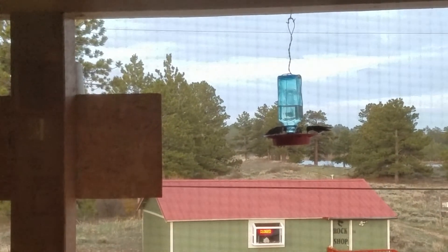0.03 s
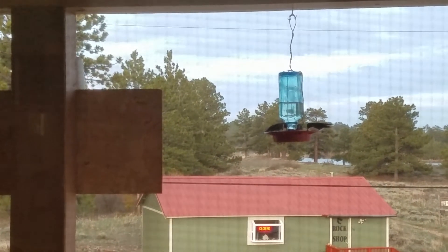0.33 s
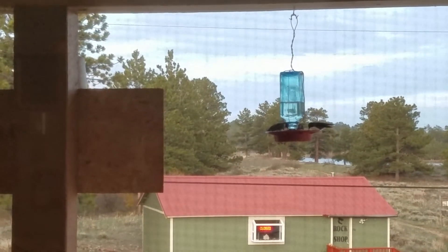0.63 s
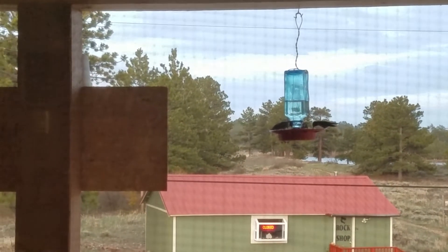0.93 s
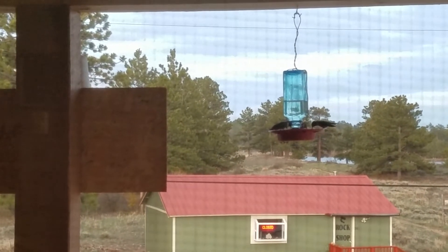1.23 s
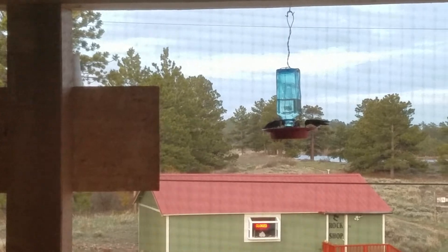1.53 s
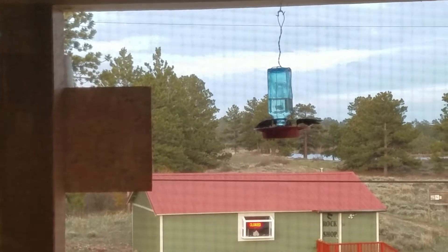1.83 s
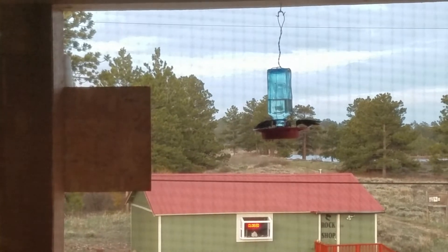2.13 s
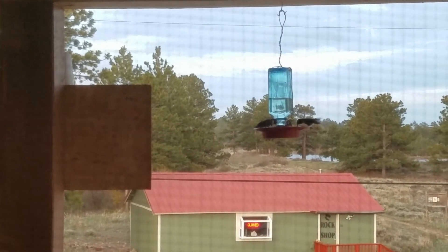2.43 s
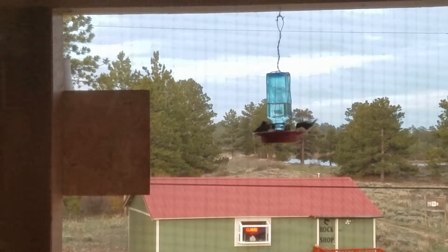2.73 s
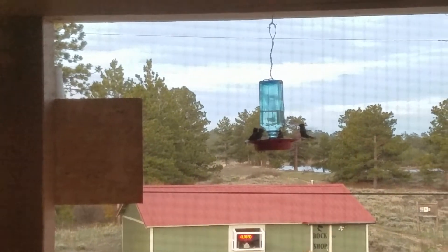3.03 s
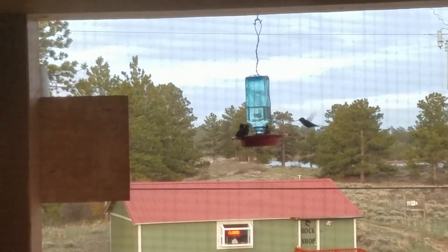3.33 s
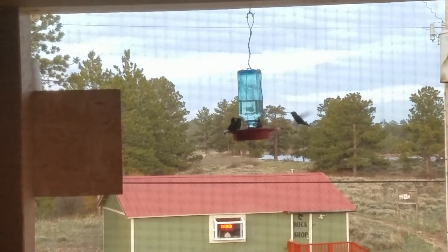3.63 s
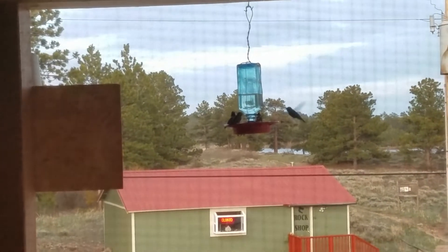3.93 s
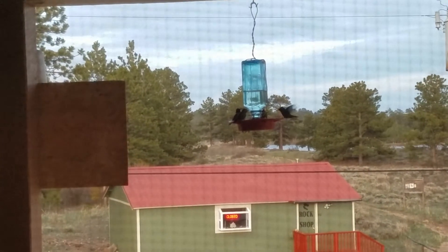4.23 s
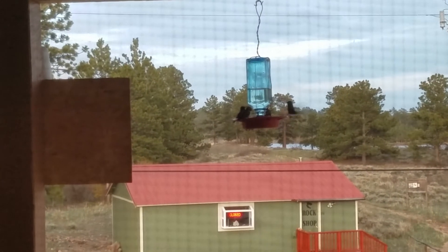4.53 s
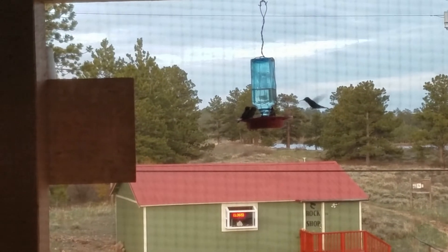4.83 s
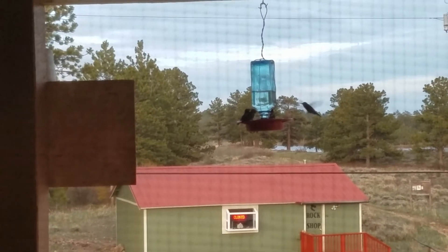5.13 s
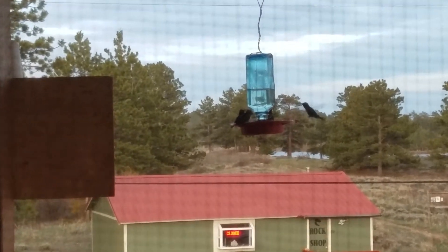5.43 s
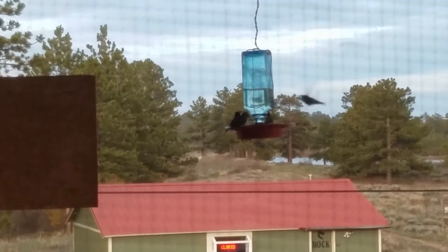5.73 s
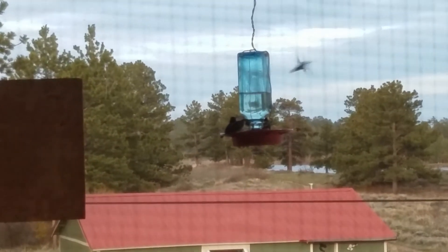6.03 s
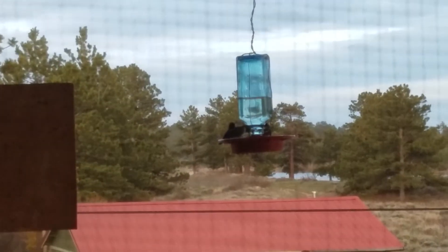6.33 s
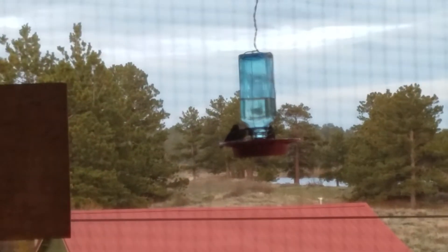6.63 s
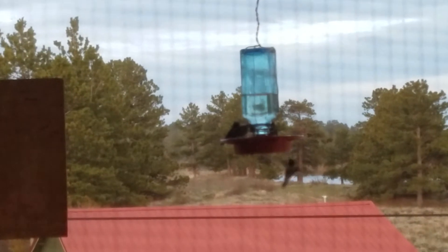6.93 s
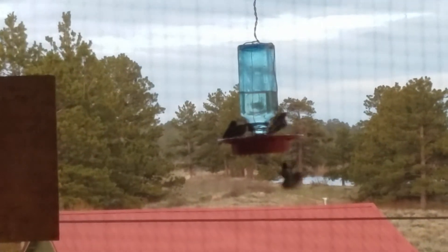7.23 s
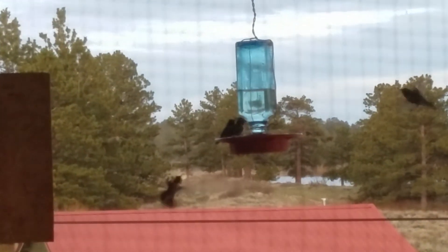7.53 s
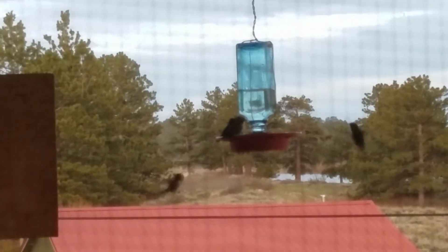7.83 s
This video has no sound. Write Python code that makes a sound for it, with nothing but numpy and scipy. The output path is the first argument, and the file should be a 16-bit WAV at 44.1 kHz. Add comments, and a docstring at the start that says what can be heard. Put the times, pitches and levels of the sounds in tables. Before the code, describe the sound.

Fingers tick, bump and slide close to the microphone, then a short scrape ends in one heavy thud that booms through a wooden house. Outside the window, hummingbirds begin a faint, high wing trill that comes in spurts and grows louder, with a low whirr as they pass and a few hoarse squeaks near the end. A quiet appliance hum with a thin electric buzz runs underneath.

```python
"""Hummingbirds through a window screen

Hummingbirds trill round a feeder: each wingbeat whistles near 6 kHz, louder and higher in every spurt
of flight, and a chase ends in hoarse squeaks. Up close, hands shift on a camera with ticks and soft
bumps, and one heavy thud sets the wooden house booming. Under it all lies the bed of the room:
an appliance motor's hum, with a thin mains buzz."""
import sys
import numpy as np
from scipy import signal
from scipy.fft import rfft, irfft, next_fast_len
from scipy.io import wavfile
from scipy.ndimage import map_coordinates

SR = 44100
rng = np.random.default_rng(int(sys.argv[2]) if len(sys.argv) > 2 else 0)


def store_pcm(level_fs):
    """Save levels as 16-bit WAV."""
    pcm = np.round(np.clip(level_fs, -1, 1) * 32767).astype(np.int16)
    wavfile.write(sys.argv[1], SR, np.atleast_2d(pcm).T)


N = 348390
TIME = np.arange(N) / SR

# room air, mid and side EQ: (frequency [Hz], relative level [dB])
AIR_MID = [(20, -14.5), (50, -10), (90, -0.5), (130, -6), (200, 1.5), (300, -3.5), (450, -11.5), (800, -17),
           (1300, -20.5), (2100, -18.5), (3200, -25), (5500, -29), (9000, -35.5), (14500, -25)]
AIR_SIDE = [(20, -8.5), (70, -1.5), (200, -2.5), (450, -7), (900, -9), (1400, -15), (2100, -11),
            (3200, -17), (5500, -19), (9000, -27), (14500, -16.5)]
# motor tones: (frequency [Hz], level [dB])
MOTOR_TONES = [(118.4, -65), (193.8, -70), (226.1, -74.5), (355, -81.5), (452.2, -79)]
# fader on the motor's lowest tone: (time [s], level [dB])
SHAFT_FADER = [(0, -65.5), (4.2, -66.5), (4.8, -74), (5.5, -74), (6, -67), (7.1, -68.5), (7.5, -78)]
SHAFT_HZ, MAINS_HZ = 59.3, 60.015
APPLIANCE_LAG_S = .00043  # it stands to the right, so the left hears it later
# buzz partials: (multiple of the mains)
BUZZ_ORDERS = [10, 12, 14, 16, 22, 26, 32, 33, 34, 36, 38, 39, 40]
# their balance: (left level [dB], right level [dB])
BUZZ_BALANCE = [(-102, -78.5), (-80, -83), (-70.5, -76), (-89, -74), (-67, -71), (-78, -78.5), (-77, -80.5),
                (-93, -76), (-66.5, -69.5), (-80, -82.5), (-95, -80), (-91, -82), (-76.5, -90)]
# stereo offset of the buzz: (frequency [Hz], right phase lag [rad])
BUZZ_PHASE = [(700, -1), (850, -2.5), (1320, -3), (1560, -2), (1900, 1), (2100, 0.47), (2400, -.8)]
# whine partials: (multiple of the mains)
WHINE_ORDERS = [83, 85, 87, 91, 93, 95, 109, 111, 169, 230, 234, 240, 242]
# their balance: (relative level [dB])
WHINE_BALANCE = [-10, -9.5, -10, -12.5, -3, -8, -9, -9.5, -10.5, -8, -12, -10, -8.5]
# faders on the buzz and the whine: (time [s], gain [dB])
BUZZ_FADER = [(.8, -3), (1.1, -7), (1.7, -0.5), (1.9, -1.8), (7.9, -1.5)]
WHINE_FADER = [(0, -75), (1.7, -83), (1.9, -74), (4.6, -75.5), (7.9, -75.5)]
# porch reverb: (frequency [Hz], t60 [s])
PORCH_DECAY = [(200, 0.12), (6000, 0.4), (15000, 0.031)]
# soft swishes: (middle [s], half length [s], level [dB], centre [Hz], width [octaves])
SWISHES = [(2.983, 0.096, -67, 12000, 0.53), (3.23, 0.085, -69.5, 11500, .6), (5.882, .016, -69, 6800, .04),
           (7.377, 0.075, -66.5, 5440, 0.53), (7.463, 0.047, -66.5, 5800, 0.63)]

# fingers on the case: (time [s], tick gain [dB], snap gain [dB], snap centre [Hz], knock gain [dB])
TOUCHES = [(0.019, -47.5, -50, 1810, -37.5), (0.1562, -44, -47, 1900, -39.5),
           (0.196, -47.5, -60, 5130, -54), (0.2253, -51.5, -52, 1400, -56), (.3424, -50, -61, 2400, -53.5),
           (0.3687, -54, -49.5, 2040, -58), (0.4532, -55, -54, 1100, -49.5),
           (0.4898, -48, -55, 5000, -52.5), (.511, -54, -53, 1400, -54.5), (0.5899, -58, -57.5, 4770, -65),
           (0.7307, -43.5, -54, 2500, -53.5), (1.7021, -55, -52, 1500, -52), (1.7253, -53, -54, 1800, -57),
           (1.742, -55, -51, 1800, -57), (1.7541, -33.5, -32, 2150, -41), (1.8603, -49, -52, 3000, -49.5),
           (2.1667, -51, -50, 15200, -65), (2.388, -43, -53, 2400, -50), (2.4071, -44, -54, 3000, -50),
           (5.002, -76, -72, 1500, -59.5)]
# soft bumps of the hand: (time [s], gain [dB])
BUMPS = [(0.055, -40.5), (0.167, -34.5), (.192, -41), (.272, -42.5), (0.384, -47.5), (0.496, -47.5),
         (0.62, -43.5), (0.756, -47), (2.435, -43.5)]
# the grip slides:
# (firmest from [s], attack [s/10 dB], hold [s], release [s/10 dB], rumble gain [dB], rustle gain [dB])
SLIDES = [(0.028, 0.054, 0.029, 0.098, -49.5, -59), (0.196, 0.062, .04, 0.025, -48.5, -67),
          (0.434, .14, 0.072, 0.088, -50.5, -66.5), (0.75, 0.16, 0.093, 0.066, -56.5, -72),
          (1.657, 0.05, 0.25, 0.15, -51, -70), (2.234, 0.089, .02, 0.086, -59, -66),
          (2.404, 0.025, 0.016, 0.19, -58.5, -72)]
# modes of the case, the camera in the hand and the house: (frequency [Hz], relative level [dB], t60 [s])
CASE_MODES = [(186, -7.5, 0.13), (291.2, -2, 0.13), (504.4, -1.5, 0.062), (593, 0, 0.052), (695, -7, 0.071),
              (840, -7, 0.045), (1280, -11, 0.043), (1560, -23, 0.027)]
HAND_MODES = [(70.7, -1.5, 0.29), (87, -16, 0.2), (110.2, 3, 0.18)]
HOUSE_MODES = [(27, -40, 1.27), (60.3, -31, 1.06), (101, -35.5, 0.94), (123, -46, 0.41),
               (175.4, -36.5, 0.56), (194, -32.5, 0.13), (238, -39.5, 0.51), (278, -45, 0.53),
               (355, -33.5, 0.22), (487, -48.5, 0.29), (579, -32, 0.12), (691, -39.5, 0.16),
               (1065, -41, 0.12)]
# EQ of the contact noises: (frequency [Hz], relative level [dB])
TICK_EQ = [(2000, -19), (3900, -8), (4900, 6.5), (6000, 0.5), (7100, -9), (8500, -1.5), (11000, -6.5),
           (16000, -4)]
RUMBLE_EQ = [(20, -21), (45, -27), (70, -1), (115, 1), (160, -9), (290, -11), (420, -25.5), (800, -26.5),
             (2000, -64)]
RUSTLE_EQ = [(150, -4), (500, 1), (1200, -4.5), (2200, -10.5), (3500, -17.5), (5200, -14), (7500, -23.5),
             (16000, -22.5)]
SCRAPE_EQ = [(40, -25), (120, 14.5), (350, 2.5), (800, 1), (1400, -14.5), (2100, -11), (3200, -21),
             (5300, -18.5), (8000, -28.5), (16000, -29)]
# the scrape grips, then bears down at the thud:
# (full from [s], attack [s/10 dB], hold [s], release [s/10 dB], gain [dB])
SCRAPE_DRAG = (1.779, 0.022, 0.07, 0.019, -42)
SCRAPE_PRESS = (1.809, .018, .004, .036, -36)

# chase squeaks: (start [s], length [s], from [Hz], to [Hz], roughness [share of pitch], gain [dB])
SQUEAKS = [(7.3, .11, 4100, 3750, .11, -69.5), (7.432, .05, 4150, 3700, .09, -73),
           (7.546, .08, 3000, 2500, .06, -67)]
# their harmonics, fundamental first: (relative level [dB])
SQUEAK_HARMONICS = [-2, -5, -7, -10]
# close fly-bys: (nearest [s], approach [s/10 dB], retreat [s/10 dB], level [dB])
FLY_BYS = [(5.78, 0.28, 0.2, -64.5), (7.35, 0.2, 0.69, -62)]
# air pushed by the wings: (frequency [Hz], relative level [dB])
WHIRR_EQ = [(60, -40), (110, -3), (220, -2.5), (330, -14.5), (600, -24), (2000, -62)]
# spurts of flight:
# (full effort from [s], attack [s/10 dB], hold [s], release [s/10 dB], level [dB], base pitch [Hz])
SPURTS = [(3.177, 0.12, .03, .045, -66, 6250), (3.32, .02, .01, .04, -71, 6070),
          (3.41, .05, .03, .04, -73, 6120), (3.522, 0.027, 0.016, 0.033, -68.5, 6200),
          (3.733, 0.13, 0.2, 0.13, -74.5, 5990), (4.45, 0.034, 0.12, 0.037, -65, 6250),
          (4.698, 0.018, .01, .09, -75, 6200), (4.89, 0.078, .03, .035, -71, 6170),
          (5.10, 0.12, .03, 0.063, -71.5, 6160), (5.35, 0.089, .03, .04, -65.5, 6090),
          (5.46, 0.023, .01, 0.037, -65.5, 6250), (5.767, 0.32, 0.035, 0.28, -59, 6280),
          (6.37, .04, .02, 0.028, -76, 6030), (6.477, 0.023, 0.12, 0.04, -64, 6170),
          (6.631, .07, .09, .02, -60.5, 6210), (6.797, 0.022, 0.065, 0.066, -67.5, 6200),
          (7.06, .06, 0.027, .04, -71, 6060), (7.215, 0.058, 0.055, .1, -66.5, 6420),
          (7.405, 0.14, .1, .05, -61.5, 6310), (7.568, 0.028, .03, 0.046, -58.5, 6270),
          (7.73, 0.033, 0.018, 0.099, -58.5, 6290), (7.88, 0.033, .03, .1, -61.5, 6180)]


def amp(db):
    """Decibels to gain."""
    return 10 ** (np.asarray(db) / 20)


def unit(x):
    """Scale to rms 1."""
    return x / np.sqrt(np.mean(x ** 2) + 1e-20)


def along(points, hz):
    """Read (Hz, value) points on a log axis."""
    f, v = np.transpose(points)
    return np.interp(np.log(hz + 1), np.log(f + 1), v)


def fader(rows):
    """Gain that rides through (s, dB) points."""
    return amp(np.interp(TIME, *np.transpose(rows)))


def swell(s, attack, hold, release):
    """Envelope in dB, 0 while held; attack and release are the times for 10 dB."""
    return -10 * (np.maximum(s - TIME, 0) / attack + np.maximum(TIME - s - hold, 0) / release)


def wobble(rate):
    """A smooth random curve, rate knots a second."""
    return map_coordinates(rng.standard_normal(int(N * rate / SR) + 4), [TIME * rate])


def filtered(x, response):
    """Shape x by a frequency response."""
    size = next_fast_len(x.shape[-1] + 8192)
    return irfft(rfft(x, size) * response(np.fft.rfftfreq(size, 1 / SR)), size)[..., :x.shape[-1]]


def noise(eq):
    """Coloured noise of rms 1."""
    return unit(filtered(rng.standard_normal(N), lambda hz: amp(along(eq, hz))))


def hiss_band(size, centre_hz, octaves):
    """Stereo noise of rms 1 in one bell-shaped band."""
    white = rng.standard_normal((2, size))
    return unit(filtered(white, lambda hz: np.exp(-.5 * (np.log2((hz + 1) / centre_hz) / octaves) ** 2)))


def spread(mid, side):
    """Mid and side to left and right."""
    return np.array([mid + side, mid - side])


def add(track, s, sound):
    """Mix a sound into a track at time s."""
    start = max(round(s * SR), 0)
    track[..., start:start + sound.shape[-1]] += sound[..., :N - start]


def ring(modes, attack_s, scatter_db, width):
    """Damped modes after one blow; the higher ones tend to sit wider in the stereo image."""
    t = np.arange(2 * SR) / SR
    out = np.zeros((2, len(t)))
    for hz, db, t60 in modes:
        age = t[:int(t60 * 1.5 * SR)]
        offset = np.minimum(width * hz / 1000, 1) * rng.uniform(-1, 1) * np.array([[1], [-1]])
        decay = amp(db + scatter_db * rng.normal() - 60 * age / t60)
        add(out, 0, decay * np.sin(2 * np.pi * hz * age + offset))
    return out * (1 - np.exp(-t / attack_s))


def porch(x):
    """Dense reflections from walls and eaves, different in each channel."""
    hz, t, spectrum = signal.stft(rng.standard_normal((2, SR // 3)), SR, nperseg=256)
    decay = amp(-60 * t / along(PORCH_DECAY, hz)[:, None])
    tail = signal.istft(spectrum * decay, SR, nperseg=256)[1]
    return signal.fftconvolve(np.atleast_2d(x), tail / np.linalg.norm(tail[0]), axes=1)[:, :N]


def room_air():
    """Still air: a soft, dark bed of noise."""
    return spread(amp(-64.5) * noise(AIR_MID), amp(-69) * noise(AIR_SIDE))


def motor():
    """The appliance motor hums in wavering tones over a shaft note that swells and fades."""
    hum = sum(amp(db + wobble(3.2)) * np.sin(2 * np.pi * hz * TIME + wobble(2.02) / 2)
              for hz, db in MOTOR_TONES)
    return hum + fader(SHAFT_FADER) * np.sin(2 * np.pi * SHAFT_HZ * TIME)


def mains_buzz():
    """Iron driven by the mains buzzes at multiples of its frequency."""
    buzz = np.zeros((2, N))
    for order, (left_db, right_db) in zip(BUZZ_ORDERS, BUZZ_BALANCE):
        hz = order * MAINS_HZ
        phase = 2 * np.pi * (hz * TIME + rng.random())
        waver_db = (.5 + min(hz / 6000, 1)) * wobble(2.07)  # short waves fade more as the camera sways
        left = amp(left_db) * np.sin(phase)
        right = amp(right_db) * np.sin(phase - along(BUZZ_PHASE, hz))
        buzz += amp(waver_db) * np.array([left, right])
    return fader(BUZZ_FADER) * buzz


def whine():
    """High multiples of the mains swell together and waver singly, louder and earlier on the right."""
    out = np.zeros((2, N))
    for order, db in zip(WHINE_ORDERS, WHINE_BALANCE):
        start = rng.random()
        for channel, pan_db, lag_s in zip(out, (-7, 0), (APPLIANCE_LAG_S, 0)):
            phase = 2 * np.pi * (order * MAINS_HZ * (TIME - lag_s) + start)
            channel += amp(db + pan_db + 2.5 * wobble(7)) * np.sin(phase)
    return fader(WHINE_FADER) * out


def draught():
    """A faint band of hiss from the right reaches the left channel later."""
    right = hiss_band(N, centre_hz=1205, octaves=.22)[0]
    left = filtered(right, lambda hz: np.exp(-2j * np.pi * hz * APPLIANCE_LAG_S))
    return amp(-77.5) * np.array([left, right])


def swishes():
    """Short ragged puffs of hiss."""
    out = np.zeros((2, N))
    for s, half_s, db, centre_hz, octaves in SWISHES:
        window = np.hanning(int(2 * half_s * SR))
        add(out, s - half_s, amp(db) * window * hiss_band(len(window), centre_hz, octaves))
    return out * unit(amp(1.7 * wobble(180)))


def clicks():
    """Each contact gives the case's bright tick and a snap whose pitch depends on the spot touched."""
    ticks, snaps = np.zeros((2, N)), np.zeros((2, N))
    t = np.arange(SR // 20) / SR
    envelope = np.exp(-t / .0035) * (1 - np.exp(-t / .0005))
    for s, tick_db, snap_db, snap_hz, _ in TOUCHES:
        add(ticks, s, amp(tick_db) * envelope * rng.standard_normal((2, len(t))))
        add(snaps, s, amp(snap_db) * envelope * hiss_band(len(t), snap_hz, octaves=.56))
    out = filtered(ticks, lambda hz: amp(along(TICK_EQ, hz))) + snaps
    return out + amp(-15) * porch(out)


def handling(knock_lag_s=.0036):
    """Fingers knock on the case, bump it softly and slide over it."""
    body = np.zeros((2, N))
    for s, *_, db in TOUCHES:  # the case gives way just after the tick
        add(body, s + knock_lag_s, amp(db) * ring(CASE_MODES, attack_s=.0008, scatter_db=1, width=.6))
    for s, db in BUMPS:
        add(body, s, amp(db) * ring(HAND_MODES, attack_s=.0055, scatter_db=2.5, width=2.6))
    rumble = sum(amp(db + swell(*shape)) for *shape, db, _ in SLIDES)
    rustle = sum(amp(db + swell(*shape)) for *shape, _, db in SLIDES)
    body += rumble * spread(noise(RUMBLE_EQ), amp(-6.5) * noise(RUMBLE_EQ))
    grain = unit(amp(2.6 * wobble(160)))
    return body + rustle * grain * spread(noise(RUSTLE_EQ), amp(2.5) * noise(RUSTLE_EQ))


def thud(hit_s=1.802):
    """A gritty scrape peaks in one heavy push, and the wooden house rings low."""
    pressure = np.maximum(*[amp(db + swell(*shape)) for *shape, db in (SCRAPE_DRAG, SCRAPE_PRESS)])
    grit = unit(amp(1.5 * wobble(300)))
    out = pressure * grit * spread(noise(SCRAPE_EQ), amp(.5) * noise(SCRAPE_EQ))
    add(out, hit_s, ring(HOUSE_MODES, attack_s=.002, scatter_db=0, width=1.3))
    # the punch lasts a few milliseconds; the air draws back before and after it
    u = (TIME - hit_s - .0026) / .0014
    out += amp(-21.5) * (1 - u ** 2) * np.exp(-u ** 2 / 2)
    return out * amp([[-.7], [.7]])  # a touch to the right


def squeaks():
    """The birds scold: falling notes whose pitch shakes so fast that they rasp."""
    notes = np.zeros(N)
    for s, length, from_hz, to_hz, rough, db in SQUEAKS:
        progress = np.clip((TIME - s) / length, 0, 1)
        glide_hz = from_hz + (to_hz - from_hz) * progress
        phase = 2 * np.pi * np.cumsum(glide_hz * (1 + rough * wobble(1500))) / SR
        tone = sum(amp(db + part_db) * np.sin(k * phase) for k, part_db in enumerate(SQUEAK_HARMONICS, 1))
        notes += np.sin(np.pi * progress) * tone
    return amp(-3) * notes + amp(-4) * porch(notes)


def wingbeats(beat_hz, drift):
    """Count of wingbeats so far, at a slightly unsteady rate."""
    return np.cumsum(beat_hz * (1 + drift * wobble(5))) / SR


def wing_whirr(beats):
    """On a close fly-by, the air pushed by each stroke is heard as a low flutter."""
    puffs = noise(WHIRR_EQ) * (1 + .82 * np.cos(2 * np.pi * beats))
    nearness = sum(amp(db + swell(s, approach, 0, retreat)) for s, approach, retreat, db in FLY_BYS)
    return nearness * unit(puffs)


def flight(hover_from_s=2.8, hover_db=-84, hover_hz=6130, sag_hz_per_db=15):
    """Loudness and pitch of the trill: spurts swell over faint hovering; pitch sinks as effort ebbs."""
    power = amp(hover_db + swell(hover_from_s, .05, N / SR, 1)) ** 2 + 1e-20
    weighted_hz = power * hover_hz
    for s, attack, hold, release, db, hz in SPURTS:
        effort_db = swell(s, attack, hold, release)
        spurt = amp(db + effort_db) ** 2
        power += spurt
        weighted_hz += spurt * (hz + sag_hz_per_db * np.maximum(effort_db, -20))
    return np.sqrt(power), weighted_hz / power


def wing_whistle(beats, pitch_hz, scatter_hz, echo_s, echo_db, burst_s=.0015, paths=28):
    """Air whistles through the wingtip feathers once a stroke; each burst finds new echoes in flight."""
    strokes = np.flatnonzero(np.diff(np.floor(beats)) > 0)
    hz = pitch_hz[strokes, None, None] + scatter_hz * rng.standard_normal((len(strokes), paths, 1))
    t = np.arange(-SR // 220, SR // 220) / SR
    window = np.exp(-.5 * (t / burst_s) ** 2)
    strength_db = 1.1 * rng.standard_normal((len(strokes), 1, 1))
    out = []
    for direct_db in (-2, 5):  # the straight path is louder on the right
        delay = rng.exponential(echo_s, hz.shape)  # later echoes are rarer and weaker
        level_db = echo_db - 3 * delay / echo_s
        delay[:, 0], level_db[:, 0] = 0, direct_db
        phase = 2 * np.pi * (hz * t + rng.random(hz.shape))
        bursts = amp(strength_db + level_db) * window * np.sin(phase)
        samples = strokes[:, None, None] + (delay * SR).astype(int) + np.arange(len(t))
        out.append(np.bincount(samples.ravel(), bursts.ravel(), N)[:N])
    return unit(np.array(out))


def hummingbirds():
    """Two birds trill with their wings: the near one drier and whirring, the far one washed in echoes."""
    near, far = wingbeats(beat_hz=48.33, drift=.02), wingbeats(beat_hz=42.1, drift=.06)
    loudness, pitch_hz = flight()
    trill = wing_whistle(near, pitch_hz + 20, scatter_hz=100, echo_s=.017, echo_db=-3)
    trill += .7 * wing_whistle(far, pitch_hz - 30, scatter_hz=190, echo_s=.03, echo_db=3)
    return loudness * unit(trill) + wing_whirr(near)


def scene():
    """The mix: birds outside, hands and house inside, over the bed of the room."""
    bed = room_air() + motor() + mains_buzz() + whine() + draught()
    return bed + hummingbirds() + squeaks() + swishes() + clicks() + handling() + thud()


def record(dry, cutoff_hz=15780):
    """A brick-wall low-pass takes off the very top."""
    return filtered(dry, lambda hz: hz < cutoff_hz)


dry = scene()
out = record(dry)
store_pcm(out)
```